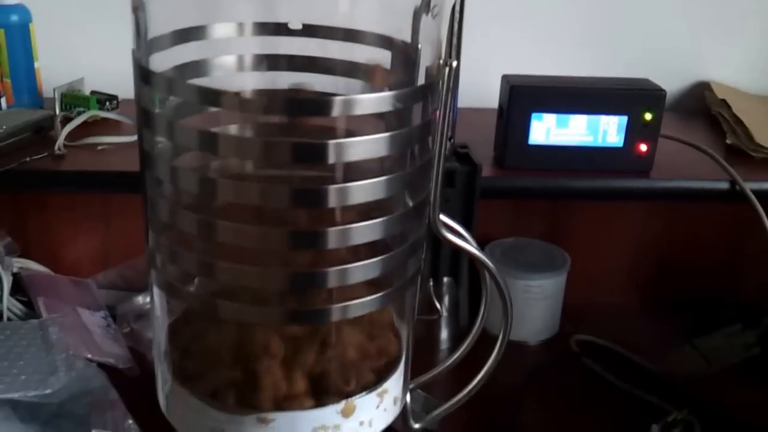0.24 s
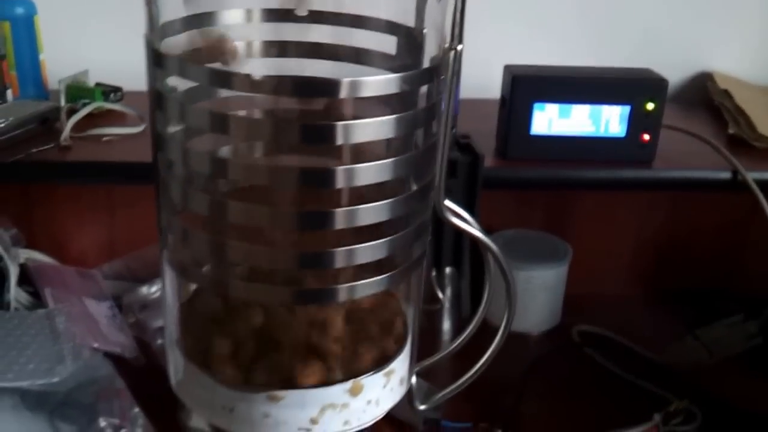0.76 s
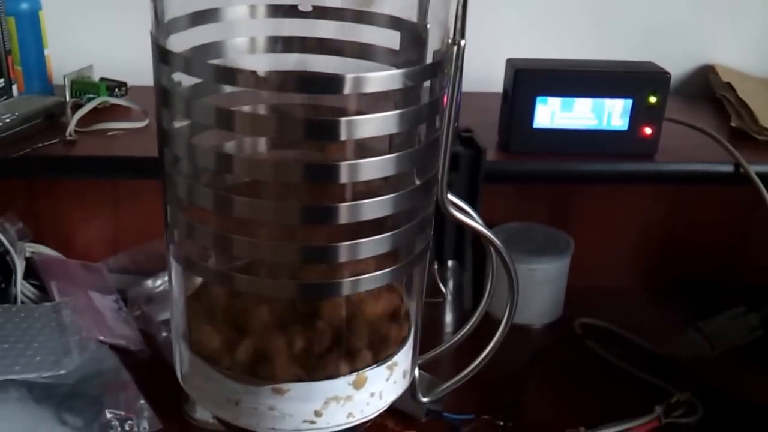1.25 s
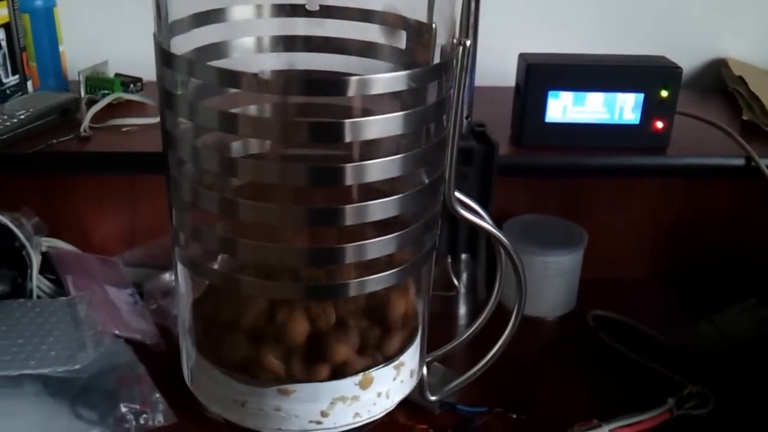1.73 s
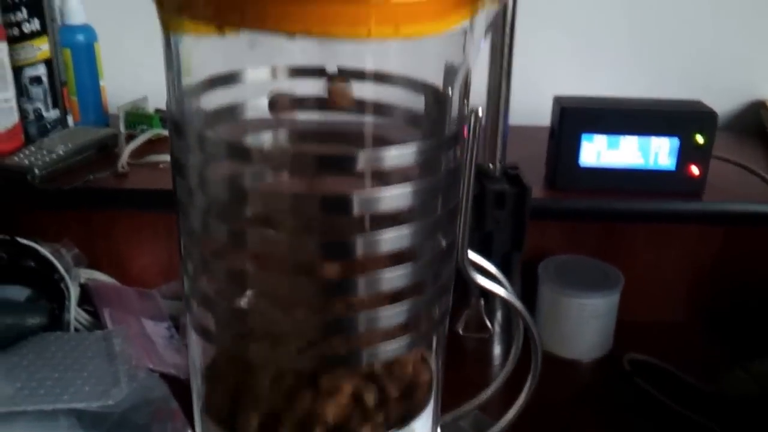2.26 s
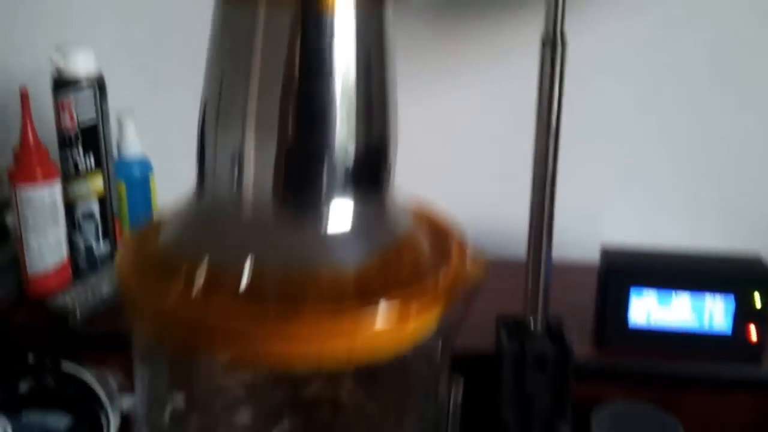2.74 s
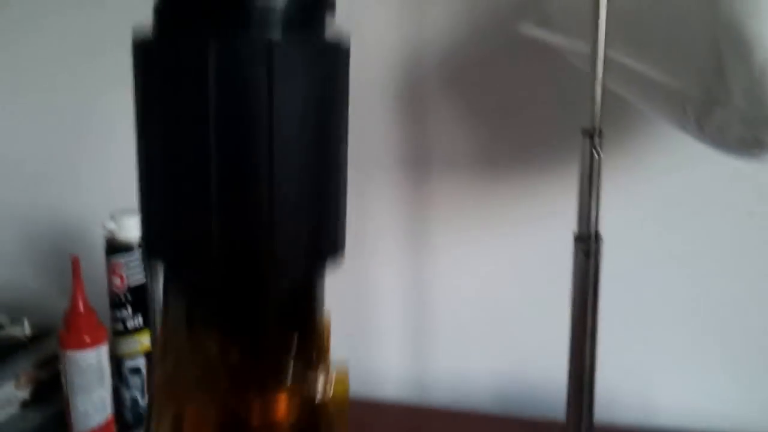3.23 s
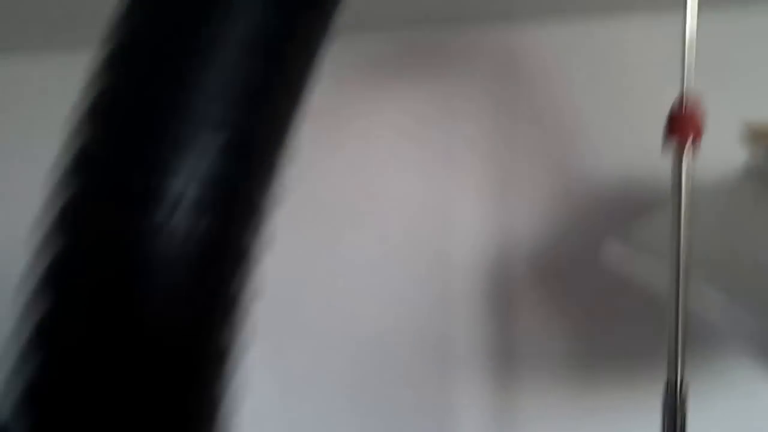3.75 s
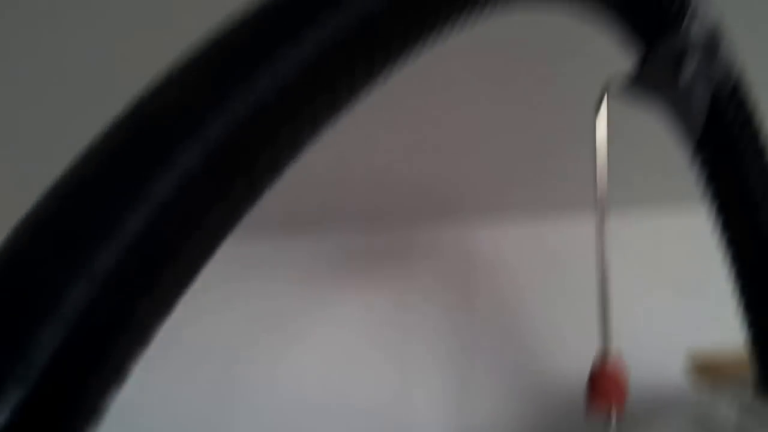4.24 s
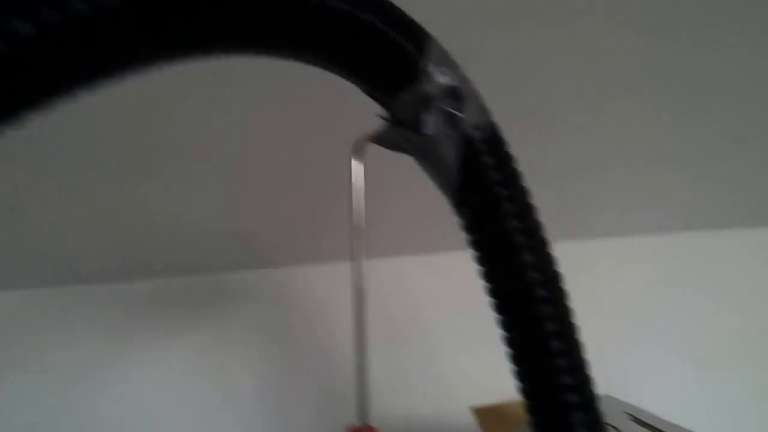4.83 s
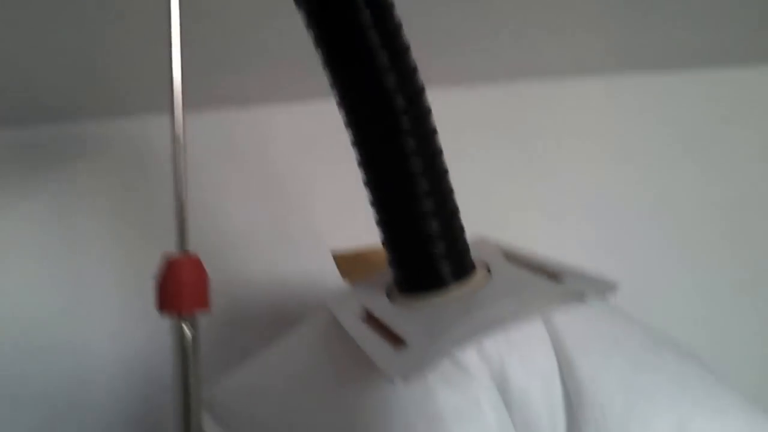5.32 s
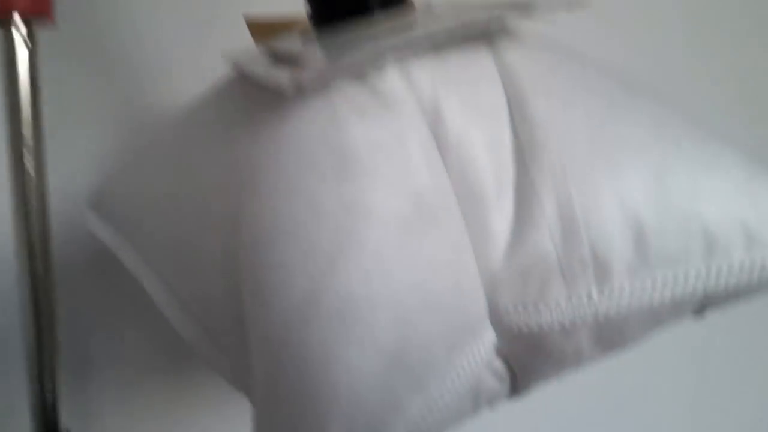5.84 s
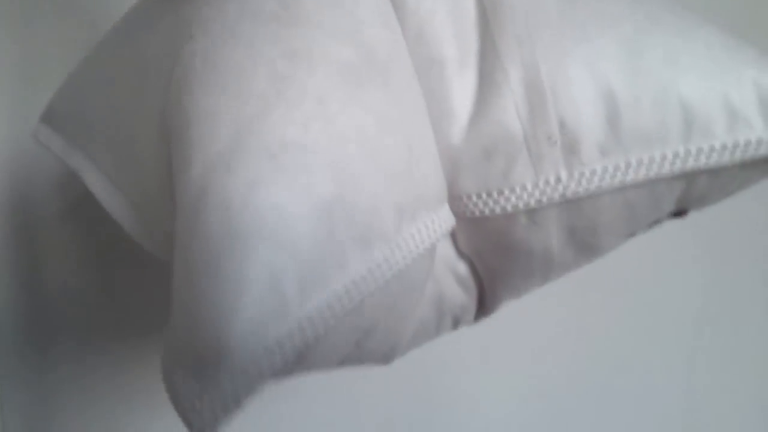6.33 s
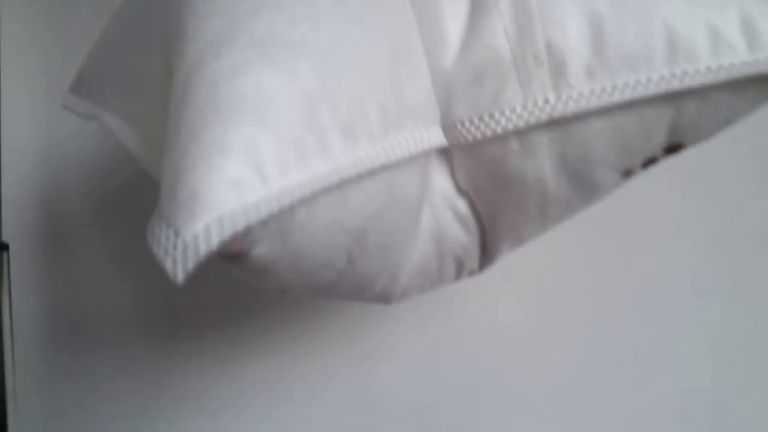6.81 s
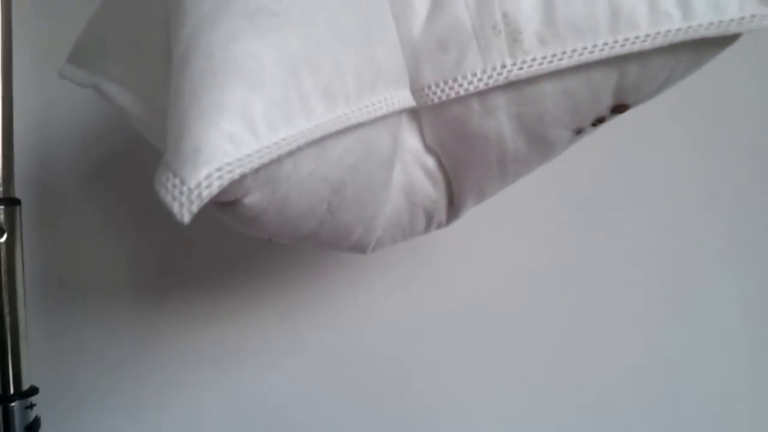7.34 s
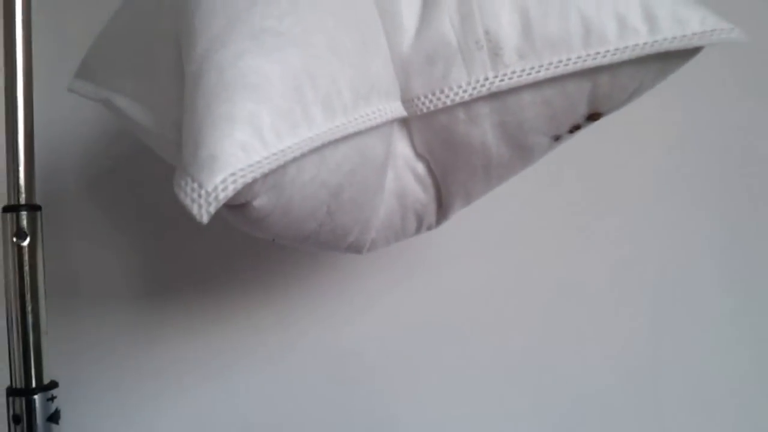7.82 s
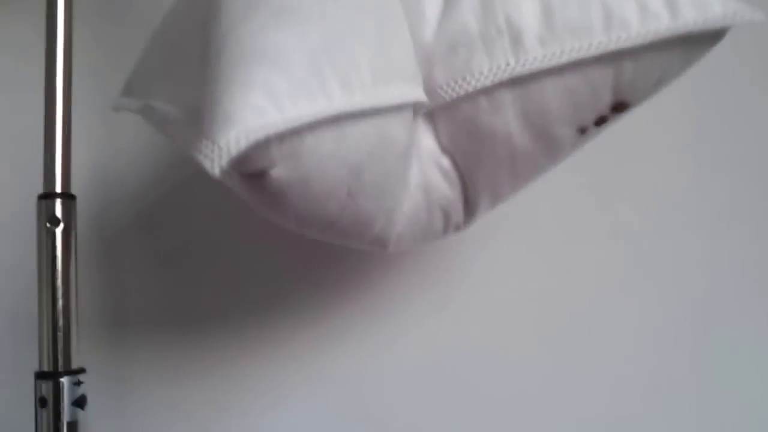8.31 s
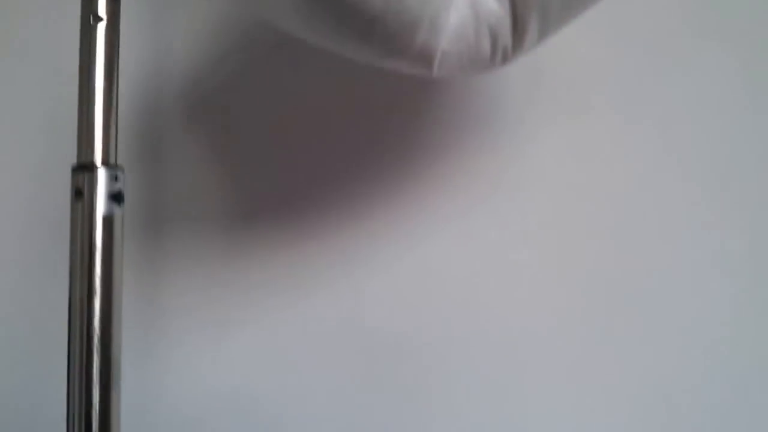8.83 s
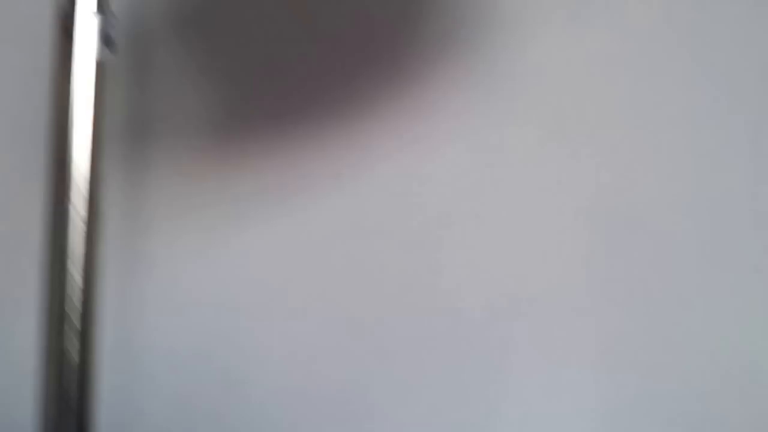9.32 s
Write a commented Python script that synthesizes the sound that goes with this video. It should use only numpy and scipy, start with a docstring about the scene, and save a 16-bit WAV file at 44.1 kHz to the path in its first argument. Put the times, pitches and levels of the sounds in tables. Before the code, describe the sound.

Steady high-pitched motor whine and broadband air roar heard up close, the whistling tones swelling and shifting sides as the microphone moves, with light bean rattle.

```python
"""Hot-air coffee roaster

A blower drives hot air through coffee beans in a glass chamber and out along a hose.
Hum, whines and weaker tones are sinusoids locked to one shaft angle; the air is five bands of shaped noise.
Beans are random strikes on decaying glass modes, above a faint low-passed rumble.
The microphone moves from chamber to outlet, so whines swell, fade and swing between the ears."""
import sys
import numpy as np
from scipy import signal
from scipy.io import wavfile
from scipy.ndimage import uniform_filter1d

SR = 44100
rng = np.random.default_rng(int(sys.argv[2]) if len(sys.argv) > 2 else 0)


def generate_wav(signal):
    """Clip the signal to [-1, 1] and save it as 16-bit WAV at the path in sys.argv[1]."""
    frames = np.transpose(np.atleast_2d(signal))
    scaled = np.clip(frames, -1, 1) * 32767
    pcm = np.round(scaled).astype(np.int16)
    wavfile.write(sys.argv[1], SR, pcm)


N = 421574
TIME = np.arange(N) / SR  # s, every sample
SLOW = np.linspace(0, N / SR, 1500)  # s, coarse axis for slow motion
LEFT_LAG_S = 0.00013  # hum and air reach the left ear later


def amp(db):
    """Decibels to gain."""
    return 10 ** (np.asarray(db) / 20)


def unit(x):
    """Scales to rms 1."""
    return x / np.sqrt(np.mean(abs(x) ** 2) + 1e-20)


def follow(rows, t):
    """Columns of a curve table, interpolated at times t."""
    s, *columns = np.transpose(rows)
    return np.array([np.interp(t, s, c) for c in columns])


def at_hz(points, hz):
    """Reads a spectrum on a log-frequency axis."""
    f, value = np.transpose(points)
    return np.interp(np.log(hz + 1), np.log(f + 1), value)


def wander(low_hz, high_hz, count=40):
    """Slow random motion of rms 1: a sum of sines at random phases."""
    rates_hz = np.geomspace(low_hz, high_hz, count)[:, None]
    turns = rates_hz * SLOW + rng.random((count, 1))
    motion = np.sin(2 * np.pi * turns).sum(0)
    return np.interp(TIME, SLOW, unit(motion))


def panned(balance_db):
    """Gains of the two ears for a left-minus-right level."""
    return amp(np.array([[0.5], [-0.5]]) * balance_db)


def direct(balance_db, likeness):
    """Strength and phase of a tone at the two ears; likeness is the cosine of their phase difference."""
    apart = np.arccos(np.clip(likeness, -1, 1))
    return panned(balance_db) * np.exp(1j * np.array([[0.5], [-0.5]]) * apart)


def tone(angle, order, ears):
    """A multiple of the shaft rate, with a slowly changing strength and phase at each ear."""
    carrier = np.exp(1j * (order * angle + 2 * np.pi * rng.random()))
    return np.sqrt(2) * np.array([(np.interp(TIME, SLOW, ear) * carrier).real for ear in ears])


# microphone path: (time [s], distance travelled [m])
MIC_PATH = [(0, 0), (2.2, .09), (3.2, .3), (6.3, .75), (8.2, .85), (9.56, 1.02)]


def standing_waves(hz, ear_gap_m=0.12, count=10):
    """Reflections from random directions interfere at two ears moving along the path."""
    along, across, start = rng.uniform(-1, 1, (3, count, 1))
    ear_offset_m = np.array([0, ear_gap_m])[:, None, None]
    metres = along * follow(MIC_PATH, SLOW)[0] + across * ear_offset_m
    wavelength_m = 343 / hz
    ears = np.exp(2j * np.pi * (metres / wavelength_m + start)).sum(1)
    return np.array([unit(ear) for ear in ears])


# mean shaft speed: (time [s], rate [turns/s])
SHAFT_SPEED = [(0, 295.4), (1.7, 295.6), (2.0, 295.55), (2.8, 295.8), (4.2, 295.45), (5.2, 295.37),
               (8.4, 295.4), (9.1, 295.25), (9.56, 295.4)]


def shaft_angle(wobble_hz=0.21):
    """Integrates a nearly steady motor speed that hunts slightly several times a second."""
    turns_per_s = follow(SHAFT_SPEED, TIME)[0] + wobble_hz * wander(2.5, 9)
    return 2 * np.pi * np.cumsum(turns_per_s) / SR


# hum at the shaft rate, before flutter: (time [s], level [dB])
HUM_LEVEL = [(0.0, -22), (0.02, -24), (2.13, -23.5), (4.76, -20), (6.6, -26.5), (7.85, -24), (9.51, -29),
             (9.56, -30)]
# its octave, before flutter: (time [s], level [dB])
OCTAVE_LEVEL = [(0, -36.5), (1.2, -37.5), (3.7, -29), (5.5, -35), (9.56, -35)]


def hum(angle, balance_db=2.8, flutter_db=0.46, octave_balance_db=-1.5, octave_flutter_db=2):
    """Rotor unbalance: one tone per turn and its wavering octave, later at the left ear."""
    phase = angle - 2 * np.pi * SHAFT_SPEED[0][1] * np.array([[LEFT_LAG_S], [0]])
    first_db = follow(HUM_LEVEL, TIME)[0] + flutter_db * wander(2, 25)
    octave_db = follow(OCTAVE_LEVEL, TIME)[0] + octave_flutter_db * wander(1.5, 9)
    first = amp(first_db) * panned(balance_db) * np.cos(phase)
    octave = amp(octave_db) * panned(octave_balance_db) * np.cos(2 * phase)
    return np.sqrt(2) * (first + octave)


# loudest whines, at 6, 7 and 8 times the shaft rate, before trim and flutter:
# (time [s], level [dB], left minus right [dB], left-right likeness [clipped to -1..1])
WHINE_ORDER_6 = [(0.0, -28.5, 8, 0.6), (2.05, -26.5, 7, 1.0), (3.05, -29, 1, -0.0), (3.9, -28.5, 7, 0.53),
                 (5.15, -26, -4, -0.3), (5.9, -31.5, 6.5, -0.045), (8.0, -28, -13, -0.88),
                 (8.35, -34, -7, -0.33), (9.55, -19.5, 4.5, -1.2)]
WHINE_ORDER_7 = [(0, -29.5, -11.5, -0.73), (2.3, -23.5, -3, -.7), (2.7, -24.5, 2, .9),
                 (3.15, -28, -7, -0.64), (3.6, -25, 1, 0.32), (4.3, -34, -9, 0), (5.1, -27, -1, -0.68),
                 (5.5, -25.5, 6, -.1), (6.2, -23.5, 2, 0.73), (6.7, -25, 13.5, -0.36),
                 (7.5, -24.5, -4, -1.13), (9, -28.5, -4, -.4), (9.56, -22, -1, -1.3)]
WHINE_ORDER_8 = [(0, -21, 9, -1.14), (1.7, -19.5, 3.5, -1), (2.6, -23, 11.5, -0.92), (2.93, -21.5, -7, 1),
                 (3.2, -33, 6, -.6), (3.45, -21.5, 11, 1), (4.12, -20.5, -10, 1), (4.35, -23, 2, -1.1),
                 (4.6, -19.5, 3, .4), (5.48, -18.5, -1, .1), (5.72, -24, -3, -0.86), (6.1, -17, -2, -0.82),
                 (6.7, -23, -2, -.55), (8.2, -21.5, 5.5, -0.82), (8.7, -29, -2, -.8),
                 (9.25, -23, -9.5, -1.1), (9.56, -27, 10, -.4)]


def whines(angle, flutter=0.11, trim_db=-0.7):
    """The loudest overtones swell, fade and swing between the ears as the microphone moves."""
    out = 0
    for order, rows in [(6, WHINE_ORDER_6), (7, WHINE_ORDER_7), (8, WHINE_ORDER_8)]:
        db, balance_db, likeness = follow(rows, SLOW)
        ears = amp(db + trim_db) * direct(balance_db, likeness)
        out = out + tone(angle, order, ears) * (1 + flutter * wander(2, 25))
    return out


# lesser whines of bearing and rotor: (multiple of the shaft rate)
LESSER_ORDERS = (6.61, 9, 10, 11, 12, 13, 15, 21)
# the same whines, before trim: (level at the chamber [dB], change along the path [dB/m],
# left minus right [dB], left-right likeness [-1..1])
LESSER_WHINES = [(-32, -0.5, 4, -0.57), (-32.5, 3, -2, -0.34), (-32.5, 0, 6, 0.71), (-31, -1, -1, -0.35),
                 (-37, 8.5, 6, 0.44), (-34.5, -3.5, 0, .4), (-32.5, -1.5, -0.5, -0.72), (-36.5, -2, 19, .7)]
# antinodes and nodes crossed: (time [s], 1/e half duration [s], multiple of the shaft rate, gain [dB])
NODE_CROSSINGS = [(1, 0.22, 13, 6), (2.3, 0.4, 21, 7.5), (2.65, 0.23, 12, 7.5), (3, .4, 6.61, -6),
                  (3.05, 0.13, 12, 12), (3.1, 0.32, 10, 8.5), (3.1, .15, 21, 9), (4.2, .25, 6.61, 4),
                  (4.7, 0.39, 10, 6.5), (4.9, 0.34, 6.61, 8), (5.35, 0.29, 12, -6), (5.4, .25, 11, -8),
                  (5.798, 0.38, 9, 3.5), (5.9, .25, 11, 2), (6.35, 0.16, 12, 2.5), (6.7, 0.41, 10, 8.5),
                  (7.85, 0.24, 10, 5.5), (9.1, 0.85, 6.61, 5)]
REFLECTED_SHARE = 0.17  # of the power


def overtones(angle, flutter=0.13, trim_db=-0.3):
    """A direct part beats against standing waves; antinodes raise and nodes lower each whine."""
    metres = follow(MIC_PATH, SLOW)[0]
    out = 0
    for order, (db, db_per_m, balance_db, likeness) in zip(LESSER_ORDERS, LESSER_WHINES):
        straight = direct(balance_db, likeness)
        reflected = panned(balance_db) * standing_waves(order * SHAFT_SPEED[0][1])
        ears = unit(np.sqrt(1 - REFLECTED_SHARE) * straight + np.sqrt(REFLECTED_SHARE) * reflected)
        swell_db = sum(gain_db * np.exp(-((SLOW - s) / span) ** 2)
                       for s, span, k, gain_db in NODE_CROSSINGS if round(k) == round(order))
        level = amp(db + trim_db + db_per_m * metres + swell_db)
        out = out + tone(angle, order, level * ears) * (1 + flutter * wander(2, 25))
    return out


def weak_tones(angle, rows, trim_db, balance_db, steady=0.38):
    """Tones fade in and out through standing waves; the high ones favour the left ear."""
    out = 0
    for order, db in rows:
        hz = order * SHAFT_SPEED[0][1]
        straight = direct(0, rng.uniform(-0.98, 1))
        ears = unit(np.sqrt(steady) * straight + np.sqrt(1 - steady) * standing_waves(hz))
        gains = amp(db + trim_db) * panned(balance_db * min(hz / 5000, 1))
        out = out + tone(angle, order, gains * ears)
    return out


# weak rotor tones, before trim: (multiple of the shaft rate, level [dB])
ROTOR_ORDERS = [(3, -38), (4, -40.5), (5, -51), (14, -40.5), (16, -42.5), (17, -40), (18, -41), (24, -46),
                (25, -45.5), (27, -48), (28, -50), (36, -56), (41, -51), (42, -51), (45, -56), (46, -49),
                (47, -53), (48, -54)]


def rotor_tones(angle):
    """Weak whole-number multiples of the shaft rate."""
    return weak_tones(angle, ROTOR_ORDERS, trim_db=2.5, balance_db=2.0)


# weak tones between the shaft harmonics, before trim; the first is a steady resonance near 818 Hz,
# the others bearing tones: (multiple of the shaft rate, level [dB])
BETWEEN_ORDERS = [(2.77, -32.5), (3.61, -38), (6.305, -35.5), (7.39, -41), (7.61, -44), (8.305, -40),
                  (8.39, -52), (8.61, -41), (9.22, -40), (9.305, -42.5), (9.61, -39.5), (9.915, -43),
                  (10.22, -48), (10.305, -44), (11.39, -44), (11.61, -50), (11.695, -46), (15.61, -43),
                  (23.13, -38), (26.435, -39.5)]


def between_tones(angle):
    """Weak tones between the shaft harmonics: bearing tones, and a steady resonance near 818 Hz."""
    return weak_tones(angle, BETWEEN_ORDERS, trim_db=0.5, balance_db=6.5)


# flutter at half the shaft rate: (time [s], level [dB])
HALF_RATE_LEVEL = [(0, -57), (1.4, -57.5), (3.1, -69), (4.3, -54), (5.3, -52.5), (6.6, -59), (7.2, -52.5),
                   (8.4, -58), (9.5, -46.5)]


def shaft_rattle(angle, upper_db=-50):
    """Bearing play comes and goes, adding tones at 0.5 and 1.5 times the shaft rate."""
    half = amp(follow(HALF_RATE_LEVEL, TIME)[0]) * wander(0.98, 10) * np.cos(angle / 2)
    upper = amp(upper_db) * wander(0.5, 6) * np.cos(1.5 * angle)
    return np.sqrt(2) * (half + upper)


# right ear turned away from the chamber: (time [s], share [0..1])
RIGHT_EAR_TURN = [(2.3, 0.28), (3.6, 0.7), (5.3, 1), (8.1, .55), (9, 0)]
# per air noise, before trim: (left at the chamber [dB], right at the chamber [dB],
# change along the path [dB/m], loss at the fully turned right ear [dB])
AIR_NOISE_LEVELS = {"drone": (-28.5, -29.5, 0, -0.5), "roar": (-22, -22.5, -0.46, -1),
                    "rush": (-20.5, -21, -2, .6), "hiss": (-21, -23.5, -0.8, 3.4),
                    "fizz": (-29.4, -29, -2, 6.5)}


def air_gain(name, t):
    """An air noise at both ears: it changes with distance, and the turned right ear is shaded."""
    left_db, right_db, db_per_m, shade_db = AIR_NOISE_LEVELS[name]
    right_shaded_db = right_db - shade_db * follow(RIGHT_EAR_TURN, t)[0]
    ears_db = np.array([np.full(len(t), left_db), right_shaded_db])
    return amp(ears_db + db_per_m * follow(MIC_PATH, t)[0])


# relative spectra: (frequency [Hz], level [dB])
# blower housing
DRONE_BAND = [(20, -62), (85, -39), (130, -27), (200, -16.5), (250, -11), (370, -17), (450, -11.5),
              (540, 2.5), (620, -1.5), (700, -0.5), (850, -34), (1500, -74)]
# hose
ROAR_BAND = [(300, -63.5), (550, -18), (630, -2), (690, 0), (760, 2), (860, 0.5), (950, -3.5), (1030, -12),
             (1130, -17), (1500, -29), (2500, -75)]
# impeller
RUSH_BAND = [(600, -54), (1000, -12.5), (1180, -2.5), (1330, 1.5), (1480, 0), (1700, -4), (2100, -3),
             (2430, 1.5), (2650, 0), (2850, -4), (3300, -3.5), (3700, -4.5), (4500, -30), (7000, -67.9)]
# air jets under the beans
HISS_BAND = [(2000, -59.4), (3400, -21.5), (3800, -5), (4300, 1.5), (4700, -0.4), (5200, -4.5), (5750, -6),
             (6400, -3.5), (6850, -2), (7400, -6), (7800, -5.5), (8400, -10.5), (9500, -36), (12000, -64.4)]
# air through the bean bed
FIZZ_BAND = [(5500, -53), (7900, -15), (8600, 1), (9400, 1), (10800, -1), (11200, -3.5), (11550, 1.5),
             (12050, -6.5), (12800, -5.5), (13600, -5), (14500, -6.5), (16000, -18.5)]
# air noise at the two ears: (frequency [Hz], likeness [-1..1])
EAR_LIKENESS = [(100, 0.67), (220, 0.62), (450, 0.84), (600, 0.67), (800, 0.93), (1000, 0.81), (1400, 0.24),
                (1900, -0.13), (3500, -0.015), (10000, -0.056)]
# resonances and nulls passed through: (centre time [s], 1/e half duration [s],
# frequency [Hz], 1/e half width [Hz], gain [dB])
RESONANCE_ZONES = [(1, 1.8, 760, 44, -5.5), (1, 2.8, 568, 61.4, -7), (2.5, 1.7, 2570, 75, 2.5),
                   (3.7, 0.38, 780, 160, -2.5), (4.7, 1.4, 864, 68, -14.5), (4.95, 0.81, 724, 28, 7.5),
                   (4.9, 0.32, 1430, 55, 6), (7, 1.2, 870, 48, 5), (9.15, 1.14, 693, 87, 5),
                   (9.5, 1, 3370, 690, 4.5)]


def air(patchy_db=1.25, gust_db=0.23, trim_db=-0.26, size=2048):
    """Turbulence coloured by housing, hose and bean bed; it churns in patches and gusts slightly."""
    hop = size // 4
    t = np.arange(N // hop + 3) * hop / SR
    hz = np.fft.rfftfreq(size, 1 / SR)
    bands = {"drone": DRONE_BAND, "roar": ROAR_BAND, "rush": RUSH_BAND, "hiss": HISS_BAND, "fizz": FIZZ_BAND}
    power = 0
    for name, spectrum in bands.items():
        colour = unit(amp(at_hz(spectrum, hz)))
        power = power + (air_gain(name, t)[:, :, None] * colour) ** 2
    zones_db = sum(db * np.exp(-((t[:, None] - s) / span) ** 2 - ((hz - f) / width) ** 2)
                   for s, span, f, width, db in RESONANCE_ZONES)
    grain = rng.standard_normal((len(t), len(hz)))
    grain = uniform_filter1d(grain, size=5, axis=0)
    patches = unit(uniform_filter1d(grain, size=24, axis=1))
    # common and opposed parts set the stereo width
    noise = rng.standard_normal((2, len(t) * hop))
    white = signal.stft(noise, nperseg=size, noverlap=size - hop)[2]
    common, opposed = white.transpose(0, 2, 1)[:, :len(t)]
    alike = np.clip(at_hz(EAR_LIKENESS, hz), -1, 1)
    common = common * np.sqrt((1 + alike) / 2)
    opposed = opposed * np.sqrt((1 - alike) / 2)
    field = np.array([common + opposed, common - opposed])
    field = field * np.sqrt(power) * amp(zones_db + patchy_db * patches)
    field[0] *= np.exp(-2j * np.pi * hz * LEFT_LAG_S)
    sound = signal.istft(field.transpose(0, 2, 1), nperseg=size, noverlap=size - hop)[1][:, :N]
    return sound * amp(trim_db + gust_db * wander(2.2, 40))


# glass modes: (frequency [Hz], relative level [dB], t60 [s])
GLASS_MODES = [(3080, -13, .012), (4660, 2, 0.028), (7170, 6.5, 0.0079), (9500, -4, .008),
               (11600, -10, .006)]


def beans(ticks_per_s=110, ticks_rms_db=-35.5, spread_db=2.5):
    """Tumbling beans strike the glass at random and ring its modes, following the level of the fizz."""
    t = np.arange(SR // 20) / SR
    sizes = amp(spread_db * np.minimum(rng.exponential(1, N), 3))
    struck = rng.random(N) < ticks_per_s / SR
    hits = struck * sizes * rng.uniform(-0.97, 1, (2, N))
    ring = sum(amp(db) * np.exp(-np.log(1000) * t / t60) * np.sin(2 * np.pi * hz * t)
               for hz, db, t60 in GLASS_MODES)
    ticks = signal.oaconvolve(hits, ring[None], axes=1)[:, :N]
    return amp(ticks_rms_db) * unit(ticks * air_gain("fizz", TIME))


# rumble beneath the motor: (time [s], level [dB])
RUMBLE_LEVEL = [(0, -70), (.6, -77), (3, -75), (5.3, -69), (6.5, -80), (8.4, -77), (9.56, -68)]


def room_rumble(corner_hz=85):
    """Low-passed noise, faint, that swells now and then."""
    lowpass = signal.butter(4, corner_hz, fs=SR, output="sos")
    low = signal.sosfilt(lowpass, rng.standard_normal(N))
    return amp(follow(RUMBLE_LEVEL, TIME)[0]) * unit(low)


def scene():
    """All tones follow one shaft angle; air, beans and room lie around them."""
    angle = shaft_angle()
    harmonics = hum(angle) + whines(angle) + overtones(angle) + rotor_tones(angle)
    between = between_tones(angle) + shaft_rattle(angle)
    return harmonics + between + air() + beans() + room_rumble()


def record(dry, ceiling=0.93, edge_hz=14540):
    """Clips peaks above the ceiling, then band-limits with a steep low-pass."""
    held = np.clip(dry, -ceiling, ceiling)
    lowpass = signal.firwin(1023, edge_hz, window=("kaiser", 9), fs=SR)
    return signal.oaconvolve(held, lowpass[None], "same")


dry = scene()
out = record(dry)
generate_wav(out)
```